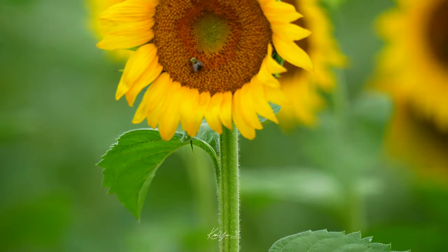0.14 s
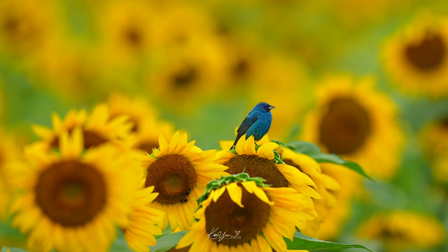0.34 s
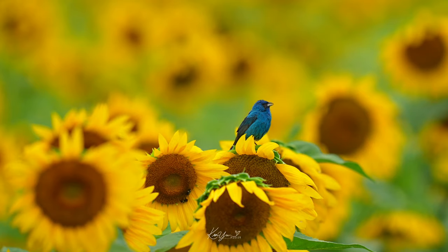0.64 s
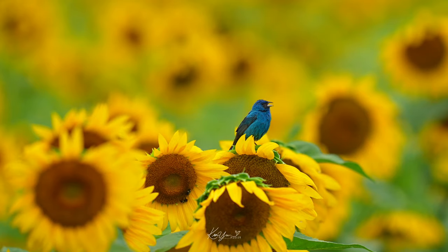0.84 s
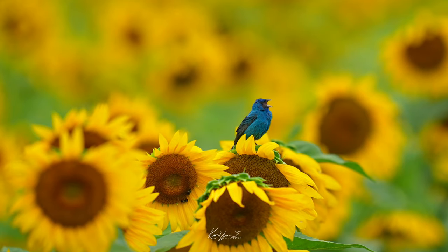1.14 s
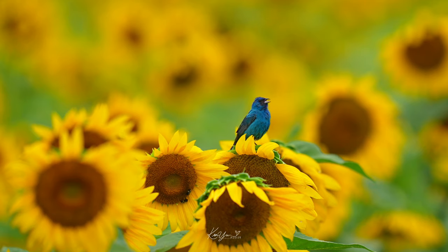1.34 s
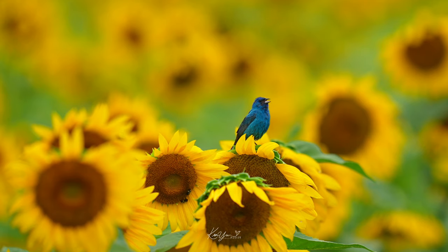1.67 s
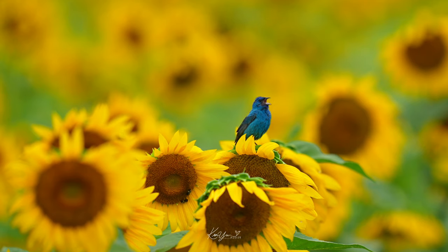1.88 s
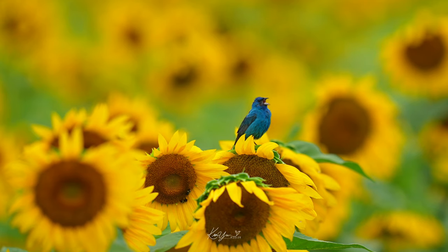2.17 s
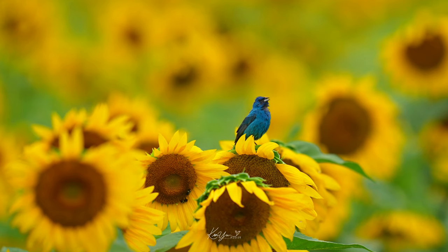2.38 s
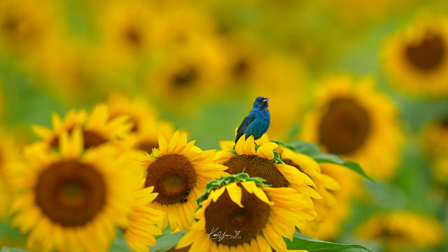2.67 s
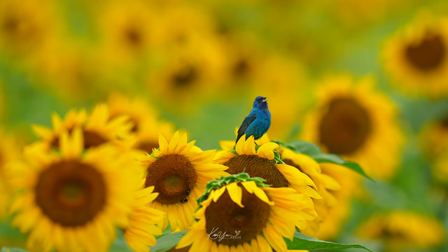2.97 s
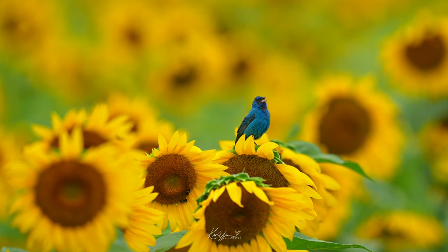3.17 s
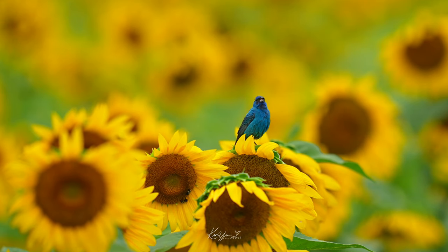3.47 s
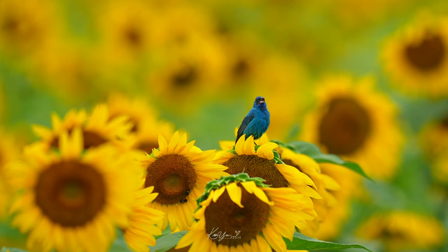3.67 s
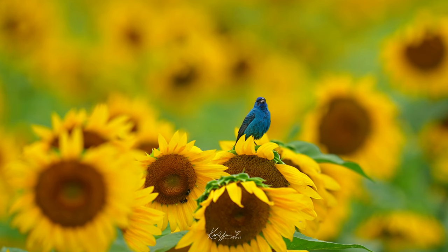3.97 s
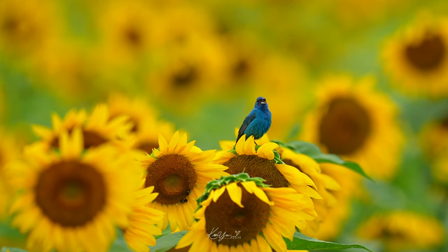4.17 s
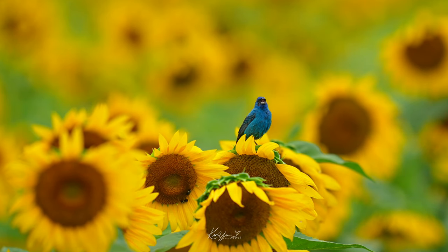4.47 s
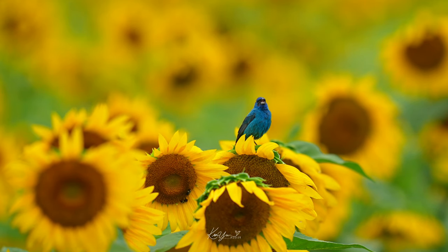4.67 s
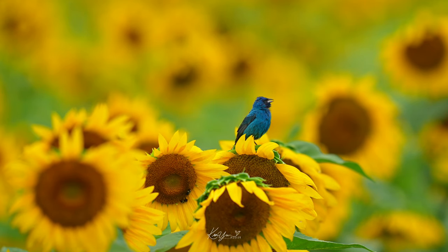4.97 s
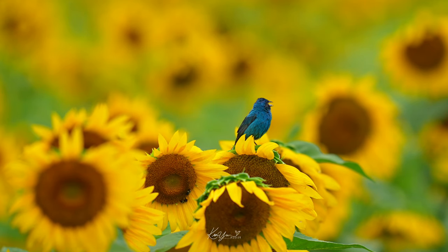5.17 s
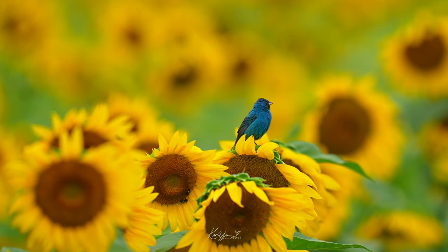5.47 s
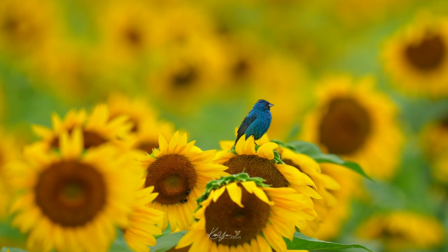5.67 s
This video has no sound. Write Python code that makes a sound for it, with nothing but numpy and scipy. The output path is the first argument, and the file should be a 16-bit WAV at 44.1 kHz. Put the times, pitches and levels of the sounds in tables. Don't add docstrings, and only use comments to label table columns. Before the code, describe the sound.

A single small bird perched on a sunflower sings near the microphone: soft rising notes first, then held tones, crisp chips, long falling slides and scooping whistles, most sung twice, with a short fuzzy echo from the plants. Faint far birds, occasional leaf rustles, crickets and muffled traffic lie underneath. A small dry buzz closes the song, leaving the quiet field.

```python
import sys
import numpy as np
from scipy import signal
from scipy.fft import rfft, irfft
from scipy.io import wavfile
from scipy.ndimage import uniform_filter1d

SR = 44100
rng = np.random.default_rng(int(sys.argv[2]) if len(sys.argv) > 2 else 0)


def output_pcm(signal):
    pcm = np.clip(np.atleast_2d(signal).T, -1, 1) * 32767
    wavfile.write(sys.argv[1], SR, np.round(pcm).astype(np.int16))


def makeup_ratio(level_db):
    decades = np.asarray(level_db, float) / 20
    return 10 ** decades


N = 257266


def evened(x):
    return x / np.sqrt(np.mean(x ** 2) + 1e-30)


def smoothed(x, reach):
    once = uniform_filter1d(x, reach, mode="nearest")
    return uniform_filter1d(once, reach, mode="nearest")


def read(points, hz):
    f, value = np.transpose(points)
    return np.interp(np.log(hz + 1), np.log(f + 1), value)


def add(mix, s, sound):
    part = mix[..., round(s * SR):][..., :sound.shape[-1]]
    part += sound[..., :part.shape[-1]]


def both_sides(lean_db):
    return makeup_ratio(lean_db * np.array([[1], [-1]]))


# pitch in Hz, level in dB.
BEAK = [(8000, -56), (11000, -54.5), (13000, -35.5), (15500, -29)]


def whistle(hz, gain, second_db=0, third_db=0):
    turn = 2 * np.pi * (np.cumsum(hz) / SR + rng.random())
    tone = np.sin(turn)
    effort = (gain / .004) ** .5
    for k, db in ((2, second_db), (3, third_db)):
        fade_out = np.clip((17000 - k * hz) / 1000, 0, 1)
        tone += effort * makeup_ratio(db + read(BEAK, k * hz)) * fade_out * np.sin(k * turn)
    return np.sqrt(2) * gain * tone


def note(rows):
    s, hz, db = np.transpose(rows)[:3]
    t = np.arange(s[0], s[-1], 1 / SR)
    reach = round(min(.006 * SR, .08 * len(t)))
    pitch = smoothed(np.interp(t, s, hz), reach)
    bend = .28
    gain = np.interp(t, s, makeup_ratio(db * bend)) ** (1 / bend)
    return t, pitch, gain * signal.windows.tukey(len(t), .05)


# seconds after the note starts, pitch in Hz, level in dB.
RISE = [(0, 4490, -83), (.007, 4400, -72), (.049, 5005, -51), (.078, 5200, -55), (.093, 5180, -68)]
HOOK = [(0, 5800, -72), (.007, 6400, -69), (.02, 6640, -67), (.046, 6000, -48), (.064, 5400, -64)]
LOW_HOLD = [(0, 3390, -88), (.02, 3594, -53.5), (.048, 3795, -49), (.089, 3863, -49), (.1, 4010, -87)]
HIGH_HOLD = [(0, 6350, -74), (.015, 6690, -54), (.045, 6650, -46), (.077, 6620, -46), (.086, 6480, -56),
             (.094, 5200, -68)]
SLIDE = [(.003, 5900, -62), (.009, 6250, -48), (.031, 4740, -46), (.045, 4190, -47), (.078, 3555, -51.5),
         (.094, 3350, -59), (.146, 3060, -60.5), (.154, 2980, -76)]
ARCH = [(0, 3460, -75), (.019, 3120, -66.5), (.037, 4530, -46), (.057, 5040, -44), (.088, 5400, -46),
        (.106, 5150, -52), (.124, 4470, -50), (.142, 4270, -42), (.186, 4160, -44)]
CHIP = [(0, 7050, -67), (.004, 7250, -54), (.009, 6800, -47), (.014, 5600, -52), (.019, 4600, -78)]
HIGH_CHIP = [(0, 8320, -95), (.003, 7850, -52.5), (.012, 6000, -43), (.018, 4580, -74)]
LOW_CAP = [(0, 3700, -72), (.014, 3900, -51), (.028, 4120, -41), (.04, 3850, -44.5), (.052, 3030, -70)]
HIGH_CAP = [(0, 4560, -60), (.011, 5080, -46.5), (.027, 4940, -36.5), (.044, 4400, -42), (.051, 4050, -70)]
LEAD_IN = [(0, 6600, -80), (.012, 6750, -71), (.029, 6750, -72), (.032, 6750, -80)]
LONG_FALL = [(0, 4800, -48), (.005, 6200, -48), (.011, 7500, -56), (.026, 5950, -47), (.042, 5450, -41.5),
             (.1, 4745, -41), (.138, 3720, -46), (.171, 2865, -70), (.195, 2050, -86)]
FLICK = [(0, 2300, -83), (.011, 2900, -72), (.03, 3740, -46.5), (.044, 4130, -48), (.049, 4350, -89)]
SPIKE = [(0, 3450, -73), (.003, 5420, -51), (.007, 6900, -52), (.022, 5720, -43), (.026, 6100, -60),
         (.031, 7000, -72)]
LADLE = [(0, 3150, -76), (.003, 4300, -46), (.0065, 5280, -52), (.02, 4120, -40.5), (.045, 3585, -49),
         (.077, 4350, -38.5), (.094, 4320, -40), (.1, 4300, -84)]
SHELF = [(0, 4130, -75), (.008, 5150, -58.5), (.028, 5510, -38.5), (.055, 5570, -40), (.062, 5300, -48),
         (.067, 5350, -72)]
CREST = [(0, 5400, -66), (.006, 6900, -60), (.015, 7090, -52), (.027, 6250, -48), (.033, 5600, -37.5),
         (.038, 5150, -47), (.05, 4600, -43), (.064, 4620, -61)]
WOBBLE = [(0, 2800, -85), (.008, 4000, -58), (.015, 2550, -74), (.025, 3460, -59), (.037, 3540, -52.5),
          (.066, 3210, -59), (.077, 3090, -68)]
CHECK = [(0, 5900, -66), (.022, 6100, -45.5), (.043, 6050, -38), (.053, 5810, -39), (.079, 4220, -47),
         (.086, 4060, -48), (.098, 4720, -40), (.112, 5370, -72)]
HUMP = [(0, 3200, -70), (.005, 4000, -56), (.011, 4600, -46), (.02, 4800, -45), (.037, 4940, -50),
        (.046, 4790, -57), (.077, 4090, -42), (.114, 3220, -65.5)]
CLIMB_DROP = [(0, 5050, -70), (.011, 5520, -55.5), (.03, 6080, -48.5), (.04, 7200, -64), (.043, 4850, -50),
              (.049, 2860, -81)]
TALL_SPIKE = [(0, 3550, -75), (.0065, 5630, -55), (.0105, 7000, -60), (.0155, 9050, -80), (.031, 5800, -55),
              (.05, 5080, -54), (.075, 4800, -67)]
BUMP = [(0, 3125, -86), (.02, 3015, -68), (.066, 3160, -63), (.091, 4660, -49.5), (.106, 3670, -53),
        (.13, 2120, -120)]
GRACE = [(0, 3700, -70), (.003, 4300, -59), (.007, 5150, -58), (.011, 5400, -62), (.014, 5250, -74)]
HIGH_GRACE = [(0, 5400, -66), (.003, 6500, -57), (.007, 7800, -61), (.011, 8300, -70)]
STAB = [(0, 4300, -70), (.003, 5800, -59), (.006, 7300, -63), (.008, 7900, -76)]
UNDERTONE = [(0, 4250, -82), (.01, 4200, -79), (.022, 3900, -82), (.025, 3150, -78), (.04, 2750, -83),
             (.053, 2200, -90)]
PICKUP = [(0, 5200, -84), (.008, 4550, -72), (.016, 4050, -67), (.019, 4100, -76)]
# note shape, start in seconds, stretch in time, change of level in dB.
PHRASE = [(RISE, .562, .95, -11), (HOOK, .63, 1.01, -7), (RISE, .785, .99, .1), (HOOK, .856, .99, .1),
          (LOW_HOLD, .99, 1, .1), (HIGH_HOLD, 1.15, .9, -1.5), (SLIDE, 1.222, 1, .1),
          (HIGH_HOLD, 1.455, 1.01, .1), (ARCH, 1.54, .985, .1), (CHIP, 1.842, .9, -5),
          (CHIP, 1.856, 1.02, .1), (HIGH_CHIP, 1.874, 1.01, -.5), (LOW_CAP, 1.887, 1.01, -.5),
          (HIGH_CAP, 1.94, 1.01, .1), (CHIP, 2.042, .95, -2), (CHIP, 2.056, 1.03, 3),
          (HIGH_CHIP, 2.074, .99, .5), (LOW_CAP, 2.087, .99, .5), (HIGH_CAP, 2.14, .99, .1),
          (LEAD_IN, 2.23, 1.01, .1), (LONG_FALL, 2.259, 1.01, .7), (FLICK, 2.465, 1.01, .5),
          (LEAD_IN, 2.556, 1.07, .1), (LONG_FALL, 2.594, .99, -.7), (FLICK, 2.798, .97, -1.5),
          (SPIKE, 2.967, 1.01, -2), (LADLE, 3.026, 1.01, -.5), (SPIKE, 3.171, .99, 2),
              (LADLE, 3.231, .99, .5), (SHELF, 3.373, 1, .1), (CREST, 3.437, 1, .1),
              (WOBBLE, 3.566, .99, .1), (CHECK, 3.645, 1.01, -.5), (WOBBLE, 3.82, 1.01, .1),
              (CHECK, 3.9, .99, .5), (HUMP, 4.205, .99, -.7), (CLIMB_DROP, 4.317, 1.01, -.3),
              (HUMP, 4.426, 1.01, .7), (CLIMB_DROP, 4.542, .99, .3), (TALL_SPIKE, 4.706, 1.01, .1),
              (BUMP, 4.77, .99, 1.5), (TALL_SPIKE, 4.954, .99, .1), (BUMP, 5.02, 1.01, -2)]
# note shape, start in seconds, stretch in time, change of level in dB.
SECOND_VOICE = [
    (HIGH_GRACE, 2.258, 1.01, .1),
    (HIGH_GRACE, 2.592, 1.01, .1),
    (UNDERTONE, 2.971, 1.01, .1),
    (PICKUP, 3.008, 1.01, .1),
    (UNDERTONE, 3.175, 1.01, -2),
    (PICKUP, 3.213, 1.01, .1),
    (GRACE, 4.2015, 1.01, .1),
    (GRACE, 4.424, 1.01, .1),
    (STAB, 4.711, 1.01, .1),
    (STAB, 4.959, 1.01, .1),
]
# time in seconds, middle pitch in Hz, level in dB, pitch swing in Hz.
BUZZ = [
    (5.22, 5450, -67, 0),
    (5.246, 5600, -54, 0),
    (5.252, 5350, -57, 400),
    (5.268, 5600, -56, 900),
    (5.289, 5120, -57, 640),
    (5.306, 5250, -58, 950),
    (5.322, 4950, -60, 680),
    (5.34, 4650, -68, 500),
]


def singer():
    out = np.zeros(N)
    for shape, start, stretch, db in PHRASE + SECOND_VOICE:
        t, pitch, gain = note(np.array(shape) * [stretch, 1, 1] + [start, 0, db])
        add(out, t[0], whistle(pitch, gain, second_db=1, third_db=-0.5))
    t, pitch, gain = note(BUZZ)
    beat = 2 * np.pi * 86 * (t - 5.2605)
    swing = np.cos(beat) + .18 * np.cos(2 * beat)
    s, depth = np.transpose(BUZZ)[[0, 3]]
    pitch = pitch + np.interp(t, s, depth) * swing
    throat = makeup_ratio(-19 * ((pitch - 5350) / 1050) ** 2)
    add(out, t[0], whistle(pitch, gain * throat))
    return out


def from_flower_head(voice):
    bounce = np.roll(voice, round(.001 * SR)) * np.array([[.25], [-.24]])
    dull_left = signal.lfilter([.8, .2], 1, voice)
    direct = np.array([dull_left, voice])
    return (direct + bounce) * both_sides(.1)


def field(x, near_db, t60, far_db, far_t60):
    length = SR // 2 + 40
    at = np.arange(60, SR // 2, 20)
    at = at + rng.integers(0, 20, (2, len(at)))
    taps, t = np.zeros((2, length)), np.arange(length) / SR
    np.put_along_axis(taps, at, rng.choice([-1., 1.], at.shape), 1)
    clumps = evened(uniform_filter1d(rng.standard_normal(length), size=300))
    taps *= makeup_ratio(4 * clumps)
    near = taps * makeup_ratio(-60 * t / t60)
    far = taps * makeup_ratio(-60 * t / far_t60)
    tail = makeup_ratio(near_db) * near / np.linalg.norm(near[0]) + makeup_ratio(far_db) * far / np.linalg.norm(far[0])
    return x + signal.fftconvolve(x, tail, axes=1)[:, :N]


# start in seconds, length in seconds, first Hz, last Hz, level in dB.
FAR_GLIDES = [(.35, .035, 4400, 3700, -89), (.698, .05, 5950, 3950, -79), (.624, .016, 4150, 3800, -92),
              (1.067, .018, 5600, 4300, -76), (1.059, .008, 4500, 5700, -77), (1.255, .09, 5600, 4350, -75),
              (1.35, .036, 4600, 3600, -77), (4.72, .032, 4880, 5120, -72), (5.535, .065, 5500, 3600, -87),
              (5.718, .028, 4550, 3700, -89), (5.759, .022, 3950, 3500, -87),
              (.866, .11, 4700, 6120, -71.5), (1.799, .062, 5500, 4050, -75),
              (3.393, .078, 5150, 3160, -85.5), (3.799, .053, 4500, 3730, -73),
              (4.302, .09, 4420, 3400, -72), (5.407, .062, 5230, 3240, -80), (4.107, .052, 5400, 5500, -73),
              (5.317, .118, 2370, 2420, -86), (5.468, .062, 2300, 2260, -89), (5.615, .17, 2370, 2430, -84),
              (5.815, .03, 2400, 2360, -84)]
# start in seconds, length in seconds, first Hz, last Hz, level in dB.
FAR_SCOOPS = [
    (.375, .105, 3700, 5300, -87),
    (.893, .105, 3600, 5000, -85),
    (.972, .04, 7700, 6100, -75),
    (3.319, .045, 6600, 5420, -72.5),
    (3.857, .038, 6650, 5800, -74),
    (4.188, .018, 5250, 4800, -78),
    (5.578, .062, 5350, 4220, -79),
]
# start in seconds, length in seconds, first Hz, last Hz, level
# in dB.
FAR_ARCHES = [(.706, .022, 3500, 5000, -85), (1.642, .036, 6050, 6800, -72), (1.223, .014, 2850, 3400, -87),
              (1.299, .017, 2350, 2800, -85), (1.34, .016, 2050, 2450, -87), (3.298, .018, 6000, 7400, -87),
              (3.525, .028, 3450, 4100, -82), (3.992, .045, 7000, 7650, -87), (4.0, .02, 2350, 2900, -88),
              (4.115, .044, 2000, 2450, -90), (4.058, .036, 3390, 3980, -77), (4.51, .026, 2450, 2620, -84),
              (4.588, .024, 3550, 3900, -78), (5.294, .068, 3500, 4230, -80),
              (5.779, .052, 3500, 4130, -81), (4.38, .042, 6060, 4830, -69), (5.198, .032, 3550, 3880, -79),
              (5.48, .042, 3600, 5600, -86),
              (4.155, .036, 6900, 5200, -75),
    (4.129, .04, 4600, 3500, -76),
    (.735, .038, 4700, 3750, -84),
    (.545, .03, 6500, 4700, -89),
    (3.6, .036, 4600, 3800, -83),
    (5.668, .045, 3950, 3250, -89),
    (5.43, .022, 2420, 2280, -90),
    (5.78, .02, 2430, 2320, -90),
    (3.645, .014, 6800, 6100, -72),
]
# start in seconds, length in seconds, edge Hz, top Hz, level in dB.
FAR_CAPS = [
    (1.246, .017, 2650, 3300, -83),
    (1.274, .018, 2650, 2950, -82),
    (4.043, .024, 2150, 2620, -85),
    (1.384, .014, 1950, 2060, -91),
    (.612, .02, 6550, 6700, -88),
    (3.66, .04, 4900, 5020, -80),
    (3.95, .05, 3550, 3650, -84),
    (5.198, .036, 3450, 3900, -83),
]
# start in seconds, level in dB.
FAR_TRIPLETS = [
    (2.912, -82),
    (3.094, -80),
]
# start in seconds, level in dB.
FAR_DROPS = [
    (.856, -83),
    (.955, -84),
    (1.146, -80),
    (1.481, -84),
    (2.865, -81),
    (4.652, -73),
]


def far_birds():
    chips = [(s + k * .016, .013, 6900 + k * 500, 5950, db + k * 2.5)
             for s, db in FAR_TRIPLETS for k in range(3)]
    drops = [(s, .035, 4400, 3350, db) for s, db in FAR_DROPS]
    kinds = (FAR_GLIDES + chips + drops, 0), (FAR_SCOOPS, -.33), (FAR_ARCHES, .35)
    calls = [(*row, share * abs(row[3] - row[2])) for rows, share in kinds for row in rows]
    calls += [(s, length, edge, edge, db, top - edge) for s, length, edge, top, db in FAR_CAPS]
    waver, flutter = evened(smoothed(rng.standard_normal((2, N)), 400))
    out = np.zeros((2, N))
    leans_db = rng.uniform(-3.5, 3.5, len(calls))
    for (s, length, first, last, db, bow), lean_db in zip(calls, leans_db):
        u = np.linspace(0, 1, round(length * SR))
        pitch = first + (last - first) * u + bow * (1 - (2 * u - 1) ** 2)
        air = np.arange(len(u)) + round(s * SR)
        pitch = pitch * (1 + .005 * waver.take(air, mode="wrap"))
        level_db = db + 1.5 * flutter.take(air, mode="wrap")
        swell = signal.windows.tukey(len(u), .35)
        add(out, s, whistle(pitch, makeup_ratio(level_db) * swell) * both_sides(lean_db))
    return out


def noise(gain_db, same, patchy_db):
    frames, hz = N // 256 + 5, np.fft.rfftfreq(1024, 1 / SR)[:, None]
    a, b, c, d, patch = rng.standard_normal((frames, 513, 5)).T
    patch = uniform_filter1d(patch, size=8, axis=0)
    patch = evened(uniform_filter1d(patch, size=12, axis=1))
    same = np.clip(same, 0, 1)
    left, other = a + 1j * b, c + 1j * d
    z = np.array([left, same * left + np.sqrt(1 - same ** 2) * other])
    z *= makeup_ratio(gain_db(hz) + patchy_db * patch)
    return signal.istft(z, nperseg=1024, noverlap=768)[1][:, :N]


def crickets():
    band = evened(noise(lambda hz: np.maximum(-3 * ((hz - 5620) / 120) ** 2, -60), .45, 1.2))
    pace = 42 + 9.1 * evened(uniform_filter1d(rng.standard_normal(N), size=8000))
    throb = .5 + .5 * np.cos(2 * np.pi * np.cumsum(pace) / SR)
    return makeup_ratio(-81) * band * evened(throb + .7)


# start in seconds, length in
# seconds, middle Hz, width in octaves, level in dB, left over right in dB.
RUSTLES = [(0.177, 0.009, 600, 1.5, -70, -2), (0.199, 0.003, 2500, 2.2, -76, 0),
           (0.222, 0.15, 2850, 2.2, -83.5, -7), (0.665, 0.25, 5560, 1.8, -83.5, 2),
           (0.7, 0.27, 1100, 0.85, -84, -13), (2.422, .014, 1150, .3, -84, 0),
           (.754, .016, 600, .6, -80, -3), (.765, .46, 860, .12, -90, -10), (.76, .48, 1190, .12, -95, -10),
           (.745, .07, 2050, .07, -92, -10), (4.08, .13, 1220, .05, -91, 8), (4.0, .1, 7600, .06, -86, 2),
           (4.027, 0.3, 1150, 0.45, -87, 8.5), (5.564, 0.26, 7160, 0.4, -90, 17)]
# start in seconds, level in dB.
SNAPS = [(2.259, -78), (2.594, -78), (2.967, -81), (3.027, -85), (3.171, -81), (3.232, -85), (3.643, -86),
         (4.207, -83), (4.43, -82), (4.709, -83), (4.957, -83)]


def rustle():
    out, leaves = np.zeros((2, N)), noise(lambda hz: 0 * hz, .3, 3)
    ticks = [(s, .006, 7500, .5, db, 0) for s, db in SNAPS]
    for s, length, hz, octaves, db, lean_db in RUSTLES + ticks:
        part = leaves[:, round(s * SR):][:, :round(length * SR)]
        size = part.shape[1]
        f, u = np.fft.rfftfreq(size, 1 / SR), np.linspace(0, 1, size)
        colour = makeup_ratio(-6 * (np.log2((f + 1) / hz) / octaves) ** 2)
        band = evened(irfft(rfft(part) * colour, size))
        swell = abs(np.sin(np.pi * u ** .54)) ** 1.3
        add(out, s, band * swell * makeup_ratio(db) * both_sides(lean_db / 2))
    return out


# pitch in Hz, level in dB per Hz.
RUMBLE = [(20, -51), (124, 6), (199, -15.5), (257, -5.5), (337, -19.5), (389, -19.5), (900, -55),
          (1980, -120)]
# time in seconds, level in dB.
TRAFFIC = [
    (.2, -65.5),
    (.55, -60.5),
    (.9, -59.5),
    (1.2, -64),
    (2.9, -66),
    (3.6, -59.5),
    (4.7, -64),
    (5.8, -63),
]
# pitch in Hz, level in dB per Hz.
AIR = [(500, -12), (2100, -21), (3000, -21), (4300, -14.5), (6000, -12.5), (6900, -23.5), (13700, -27),
       (14600, -41)]


def background():
    s, db = np.transpose(TRAFFIC)
    mono = 1 - (np.fft.rfftfreq(1024, 1 / SR)[:, None] / 800) ** 3
    rumble = evened(noise(lambda hz: read(RUMBLE, hz) - 12 * np.clip(1 - hz / 90, 0, 1), mono, 1.2))
    hiss = evened(noise(lambda hz: read(AIR, hz) - 38 * np.clip(1 - hz / 400, 0, 1), .6 * mono, 1.2))
    traffic = rumble * makeup_ratio(np.interp(np.arange(N) / SR, s, db))
    return traffic + makeup_ratio(-83) * hiss * makeup_ratio([[-1.1], [1.1]])


def scene():
    bird = field(from_flower_head(singer()), near_db=-11.5, t60=.03, far_db=-20.5, far_t60=.33)
    others = field(far_birds(), near_db=-6, t60=.05, far_db=-12, far_t60=.3)
    return bird + others + crickets() + rustle() + background()


def masked(x):
    hz, _, z = signal.stft(x, SR, nperseg=1024)
    power = (abs(z) ** 2).mean(0)
    bins_db = 10 * np.log10(power + 1e-20)
    slope = 5.5 * hz[:, None] / 1000
    loud_db = np.where(hz[:, None] > 2000, bins_db, -200)
    hidden_db = np.maximum.accumulate(loud_db + slope, axis=0) - slope - 39
    band_db = 10 * np.log10(power[:512].reshape(32, 16, -1).mean(1) + 1e-20)
    under = np.clip((hidden_db[8:512:16] - band_db) / 3, 0, 1) * (hz[8:512:16, None] > 6500)
    under = np.append(np.repeat(under, 16, axis=0), under[-1:], axis=0)
    return signal.istft(z * makeup_ratio(-28 * under), SR, nperseg=1024)[1][:, :N]


def low_pass(x):
    return signal.sosfilt(signal.butter(12, 15700, fs=SR, output="sos"), x)


def record(dry):
    since_open = np.arange(N) / SR - .1723
    gate = np.interp(since_open, [-.004, .004, .006, .028, .03, .042, .046], [0, .15, 1, 1, .35, .3, .94])
    mix = masked(dry * gate)
    return low_pass(mix)


dry = scene()
out = record(dry)
output_pcm(out)
```